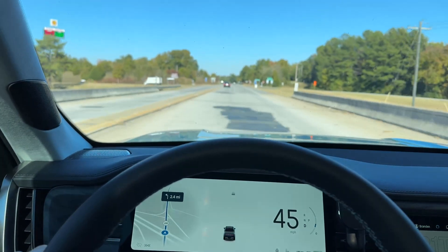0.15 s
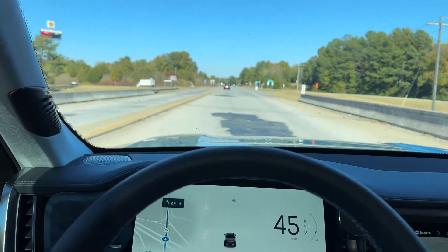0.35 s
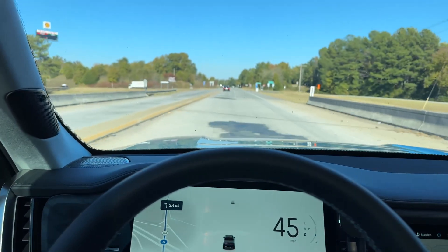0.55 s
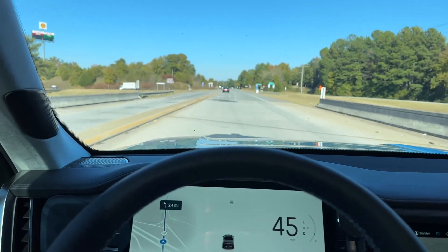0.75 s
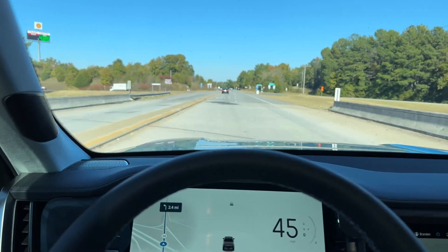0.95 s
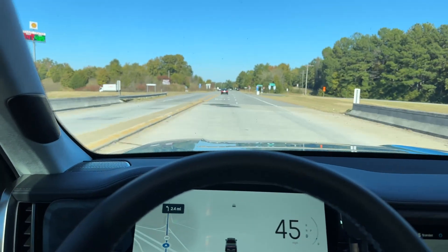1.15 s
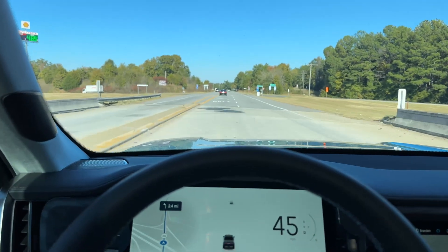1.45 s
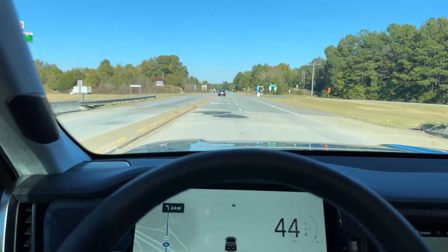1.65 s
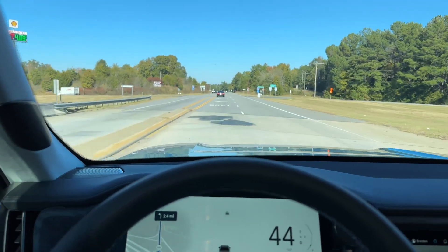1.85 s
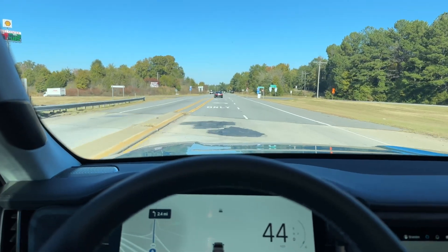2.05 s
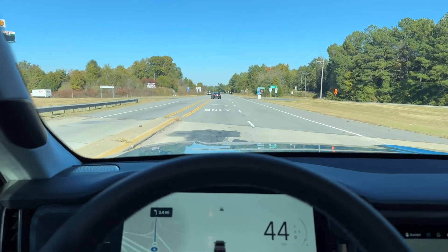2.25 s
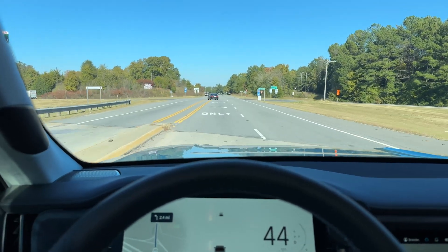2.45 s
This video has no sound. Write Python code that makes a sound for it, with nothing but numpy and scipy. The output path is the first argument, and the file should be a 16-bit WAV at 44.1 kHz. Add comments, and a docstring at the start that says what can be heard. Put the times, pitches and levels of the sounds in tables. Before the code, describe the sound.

Deep, boomy road rumble with steady muffled tyre roar inside a closed car, heard from the driver's seat. Soft thuds begin near 0.35 s and crowd together from 0.8 to 1.45 s, strongest around 1.1 s, with a brief coarse tread growl at 1.05-1.3 s and very faint plastic ticks and rustles. A last deep bump comes near 1.65 s; from 1.9 s the drone is smoother and quieter, over barely audible air hiss.

```python
"""Inside a car cruising at about 70 km/h. Road texture shakes the body and booms the cabin: shaped noise,
loudest over a rough stretch in the middle. Bumps ring decaying modes; the tread growls on a coarse patch.
Tyres roar almost steadily with narrow resonances and air hisses on the glass, all as shaped noise.
Trim chatters, ticks and rustles in noise bursts and squeaks once as a falling sine; a thin electrical
whine is a pure tone."""
import sys
import numpy as np
from scipy import signal
from scipy.fft import rfft, irfft
from scipy.io import wavfile
from scipy.ndimage import uniform_filter1d

SR = 44100
rng = np.random.default_rng(int(sys.argv[2]) if len(sys.argv) > 2 else 0)


def transcribe(signal):
    """Save signal, clipped to [-1, 1], as a 16-bit WAV file at the path in sys.argv[1]."""
    frames = np.atleast_2d(signal).T
    limited = np.clip(frames, -1, 1)
    pcm = np.round(limited * 32767).astype(np.int16)
    wavfile.write(sys.argv[1], SR, pcm)


N = 114660


def undb(db):
    """Decibels to amplitude gain."""
    return 10 ** (np.asarray(db) / 20)


def unit(x):
    """Scale to rms 1."""
    return x / np.sqrt(np.mean(x ** 2))


def noise(gain):
    """Random-phase noise of rms 1 with the given gain per frequency bin."""
    phase = 2 * np.pi * rng.random(len(gain))
    return unit(irfft(gain * np.exp(1j * phase), N))


def over_log_hz(points):
    """Interpolate (Hz, dB) points on log frequency, one value per bin."""
    hz, db = np.array(points).T
    f = np.maximum(np.fft.rfftfreq(N, 1 / SR), 1)
    return np.interp(np.log(f), np.log(hz), db)


def coloured(points):
    """Noise of rms 1 along (Hz, dB) points, rolled off at 12 dB/octave above the last."""
    f = np.maximum(np.fft.rfftfreq(N, 1 / SR), 1)
    last_hz = points[-1][0]
    rolloff = np.hypot(1, (f / last_hz) ** 2)
    return noise(undb(over_log_hz(points)) / rolloff)


def pair(points):
    """Unrelated noise of one colour on left and right."""
    return np.array([coloured(points), coloured(points)])


def wide(common, difference):
    """Left and right from their common part and their difference."""
    return np.array([common + difference, common - difference])


def walk(rate_hz):
    """Random levels, one per 1 / rate_hz, smoothed twice over that time; rms 1."""
    hold = int(SR / rate_hz)
    steps = np.repeat(rng.standard_normal(N // hold + 1), hold)
    return unit(uniform_filter1d(uniform_filter1d(steps, hold), hold)[:N])


def bursts(t, rows, rise_s, fall_s):
    """Sum of envelopes, each a straight rise and an exponential fall."""
    total = 0
    for start_s, db in rows:
        rise = np.clip((t - start_s) / rise_s, 0, 1)
        fall = np.exp(-np.maximum(t - start_s - rise_s, 0) / fall_s)
        total = total + undb(db) * rise * fall
    return total


def ring(age, hz, t60_s, rise_s):
    """One mode, pushed softly at age 0 and dying away by 60 dB per t60_s."""
    push = 1 - np.exp(-(age / rise_s) ** 2)
    decay = np.exp(-np.log(1000) * age / t60_s)
    return push * decay * np.sin(2 * np.pi * hz * age)


# Spectra of cabin boom, body rumble, rumble's left-right difference: [f/Hz, level/dB per Hz, relative]
BOOM_SPECTRUM = [(18, -40), (28, -18), (36, -3), (45, -2), (52, 2), (61, -8), (80, -14), (130, -35)]
RUMBLE_SPECTRUM = [(40, -21.5), (66, -8), (80, -5.5), (97, 2), (125, -1), (150, -3), (166, -8), (220, -15),
                   (300, -24.5), (500, -30.5), (1000, -55), (2500, -79)]
RUMBLE_SIDE_SPECTRUM = [(20, -34), (40, -7.5), (52, -6), (78, -3), (94, 4), (116, -13), (146, 0),
                        (170, -9.5), (250, -1), (320, -12.5), (700, -32.5), (2500, -69)]
BOOM_DB, RUMBLE_DB, RUMBLE_SIDE_DB = -27.5, -26.5, -40.5  # rms, before the roughness gains


def rumble(shake, boom):
    """Road texture shakes the body panels (shake) and the cabin air (boom)."""
    cabin_boom = undb(BOOM_DB) * boom * coloured(BOOM_SPECTRUM)
    body = undb(RUMBLE_DB) * shake * coloured(RUMBLE_SPECTRUM)
    side = undb(RUMBLE_SIDE_DB) * shake * coloured(RUMBLE_SIDE_SPECTRUM)
    return wide(cabin_boom + body, side)


# Spectra of tyre roar, common and left-right difference: [f/Hz, level/dB per Hz, relative]
TYRE_SPECTRUM = [(60, -13), (180, -1), (255, 6), (310, -4), (420, -1), (560, -5.5), (650, -10.5), (800, -9),
                 (980, -15), (1200, -16.5), (1330, -20), (1530, -19), (1950, -27), (2400, -28), (3200, -37),
                 (6000, -65), (16000, -76.5)]
TYRE_SIDE_SPECTRUM = [(60, -3), (200, -10.5), (255, 7.5), (310, -3.5), (480, -3.5), (800, -6), (1000, -9.5),
                      (1200, -11.5), (1550, -14), (2000, -23), (3000, -29.5), (6000, -54.5), (16000, -65)]
# Narrow resonances of tread and wheel wells: [f/Hz, half-width at half amplitude/Hz, rms level/dB]
TREAD_RESONANCES = [(504, 5.2, -54.5), (790.6, 25, -62.5), (1168, 25, -62.5), (1475, 40, -69)]
TYRE_DB, TYRE_SIDE_DB = -40.5, -45  # rms, before the slight shake gain
TYRE_SHAKE_EXPONENT = .047  # roar barely follows the road


def tyre_roar(shake):
    """Nearly steady broadband roar plus noise through narrow resonances."""
    f = np.fft.rfftfreq(N, 1 / SR)
    resonances = 0
    for hz, width_hz, db in TREAD_RESONANCES:
        resonances = resonances + undb(db) * noise(1 / (1 + ((f - hz) / width_hz) ** 2))
    common = undb(TYRE_DB) * coloured(TYRE_SPECTRUM) + resonances
    side = undb(TYRE_SIDE_DB) * coloured(TYRE_SIDE_SPECTRUM)
    return shake ** TYRE_SHAKE_EXPONENT * wide(common, side)


# Spectrum of air on the glass: [f/Hz, level/dB per Hz, relative]
AIR_SPECTRUM = [(1000, -1.5), (2500, 4.5), (4200, 3), (6200, -2.5), (8000, -8), (9700, -12), (11500, -24),
                (14000, -23.5), (16000, -28.5)]
AIR_DB = -66.5


def air():
    """Smooth hiss of air along the windows, unrelated left and right."""
    return undb(AIR_DB) * pair(AIR_SPECTRUM)


# Fine chatter of the trim: [t/s, level/dB before flicker]
CHATTER_LEVELS = [(0, -82), (.65, -81), (.9, -77), (1.08, -77), (1.17, -72), (1.4, -75), (1.75, -75),
                  (1.86, -81), (2.2, -83), (2.6, -84)]
# Ticks of loose plastic: [t/s, level/dB]
TICK_EVENTS = [(.838, -70), (.866, -66), (.942, -70), (1.002, -68), (1.111, -62), (1.164, -67),
               (1.225, -70), (1.274, -66), (1.42, -72), (1.532, -70), (1.672, -74), (1.703, -67),
               (1.866, -74)]
# Spectrum shared by ticks and chatter: [f/Hz, level/dB per Hz, relative]
TICK_SPECTRUM = [(2000, -8), (4500, -6.5), (6000, -4.5), (8000, -11), (9800, 1), (10800, -4),
                 (11800, -10.5), (15000, -8.5)]
CHATTER_FLICKER_DB, CHATTER_FLICKER_HZ = 2, 110
TICK_RISE_S, TICK_FALL_S = .002, .017


def chatter_and_ticks(t):
    """Loose plastic: noise under a flickering floor and short tick envelopes, added in power."""
    chatter_db = np.interp(t, *np.array(CHATTER_LEVELS).T)
    chatter = undb(chatter_db + CHATTER_FLICKER_DB * walk(CHATTER_FLICKER_HZ))
    ticks = bursts(t, TICK_EVENTS, TICK_RISE_S, TICK_FALL_S)
    return np.hypot(ticks, chatter) * wide(coloured(TICK_SPECTRUM), .55 * coloured(TICK_SPECTRUM))


WHINE_HZ, WHINE_DB = 14520, -85  # level is rms


def whine(t):
    """Faint steady electrical tone, a quarter cycle apart between the sides."""
    phase = 2 * np.pi * WHINE_HZ * t
    return np.sqrt(2) * undb(WHINE_DB) * np.array([np.sin(phase), np.cos(phase)])


# Bumps under the wheels: [t/s, thud level/dB, deep boom level/dB]
BUMP_EVENTS = [(.344, -16, -28), (.374, -16, -28), (.497, -17, -17), (.598, -14, -17), (.718, -14, -20),
               (.824, -11, -22), (.880, -8.5, -15), (.936, -9, -24), (.982, -15, -9), (1.060, -6, -22),
               (1.099, -6, -8), (1.173, -6.5, -9), (1.249, -10, -15), (1.274, -13, -8), (1.297, -18, -5),
               (1.357, -16, -14), (1.447, -17, -15), (1.638, -20, -9.5)]
# Cabin modes rung by a bump: [nominal f/Hz, t60/s, level/dB re thud]
CABIN_MODES = [(98, .11, -5), (122, .1, -6), (205, .04, -15)]
THUD_RISE_S = .0058
DEEP_HZ, DEEP_T60_S, DEEP_RISE_S = 51, .16, .015  # nominal pitch
BUMP_DETUNE = .03  # relative spread of pitch


def bumps(t):
    """Each bump rings short cabin modes fast and a deep boom that builds more slowly."""
    out = 0
    detunes = 1 + BUMP_DETUNE * rng.standard_normal((len(BUMP_EVENTS), 2))
    for (start_s, thud_db, deep_db), (thud_detune, deep_detune) in zip(BUMP_EVENTS, detunes):
        age = np.maximum(t - start_s, 0)
        thud = 0
        for hz, t60_s, db in CABIN_MODES:
            thud = thud + undb(db) * ring(age, hz * thud_detune, t60_s, THUD_RISE_S)
        deep = ring(age, DEEP_HZ * deep_detune, DEEP_T60_S, DEEP_RISE_S)
        out = out + undb(thud_db) * thud + undb(deep_db) * deep
    return out


SQUEAK_S, SQUEAK_LENGTH_S, SQUEAK_DB = .574, .0013, -61  # centre, 1/e half-length, peak
SQUEAK_HZ, SQUEAK_FALL_HZ_PER_S = 7550, 150000  # pitch at centre


def squeak(t):
    """One tiny trim squeak: a falling sine under a Gaussian envelope."""
    age = t - SQUEAK_S
    envelope = np.exp(-(age / SQUEAK_LENGTH_S) ** 2)
    phase = 2 * np.pi * age * (SQUEAK_HZ - SQUEAK_FALL_HZ_PER_S * age / 2)
    return undb(SQUEAK_DB) * envelope * np.sin(phase)


# Rustles of the trim: [t/s, level/dB before grain]
RUSTLE_EVENTS = [(.702, -60.5), (.724, -66), (.897, -68), (.932, -68), (1.124, -56.5), (1.170, -64.5),
                 (1.31, -65.5)]
# Rustle spectrum: [f/Hz, level/dB per Hz, relative]
RUSTLE_SPECTRUM = [(1200, -8.5), (2600, 0), (3500, -1.5), (4500, 1.5), (5600, -6), (7800, -7),
                   (10500, -11.5), (15000, -19)]
RUSTLE_RISE_S, RUSTLE_FALL_S = .011, .024
RUSTLE_GRAIN_DB, RUSTLE_GRAIN_HZ = 1.8, 220


def rustles(t):
    """Rubbing trim: grainy noise bursts, unrelated left and right."""
    envelope = bursts(t, RUSTLE_EVENTS, RUSTLE_RISE_S, RUSTLE_FALL_S)
    grain = undb(RUSTLE_GRAIN_DB * walk(RUSTLE_GRAIN_HZ))
    return envelope * grain * pair(RUSTLE_SPECTRUM)


# Spectrum of tread growl on a coarse patch: [f/Hz, level/dB per Hz, relative]
PATCH_SPECTRUM = [(120, -11), (250, 2.5), (400, 0), (550, -8), (780, -8.5), (1100, -27), (2500, -35.5)]
PATCH_START_S, PATCH_END_S, PATCH_RISE_S, PATCH_FALL_S = 1.05, 1.29, .029, .035
PATCH_DB = -42


def patch_growl(t):
    """Tread noise swells onto a coarse patch of road and decays after it."""
    rise = np.clip((t - PATCH_START_S) / PATCH_RISE_S, 0, 1)
    fall = np.exp(-np.maximum(t - PATCH_END_S, 0) / PATCH_FALL_S)
    growl = wide(coloured(PATCH_SPECTRUM), .6 * coloured(PATCH_SPECTRUM))
    return undb(PATCH_DB) * rise * fall * growl


# Left minus right: [f/Hz, level/dB]
LEFT_LEAN = [(60, 0.2), (88, 6), (125, -0.5), (155, 5.5), (240, -0.5), (310, 3), (450, -2), (620, 2),
             (1100, 0), (2200, -2), (4000, 1), (7000, 3), (10000, -0.5)]


def lean(x):
    """Tilt each frequency left or right, as the cabin does at the driver's seat."""
    side_db = over_log_hz(LEFT_LEAN)
    return irfft(rfft(x) * undb(np.array([side_db, -side_db]) / 2), N)


# How hard the road shakes the car: [t/s, body drone gain/dB, deep cabin boom gain/dB]
ROAD_ROUGHNESS = [(0, -2, -9), (.18, -1.5, -3), (.35, .5, -1), (.55, -1.5, -.5), (.76, .5, 1), (.93, 2, 1),
                  (1.13, 3.5, 3), (1.31, 3, 3), (1.48, 1.5, 2), (1.58, -2, 0), (1.72, 0, -1.5),
                  (1.86, -3, -5), (2.2, -2.5, -5.5), (2.42, -2, -2), (2.6, -2.5, -8)]


def scene():
    """Everything heard from the driver's seat."""
    t = np.arange(N) / SR
    times_s, shake_db, boom_db = np.array(ROAD_ROUGHNESS).T
    shake = undb(np.interp(t, times_s, shake_db))
    boom = undb(np.interp(t, times_s, boom_db))
    road = rumble(shake, boom) + tyre_roar(shake) + bumps(t) + patch_growl(t)
    trim = chatter_and_ticks(t) + squeak(t) + rustles(t)
    return lean(road + air() + trim + whine(t))


LOW_CUT_HZ, TOP_HZ = 29, 15700


def record(dry):
    """The phone cuts the deepest bass and the top."""
    low_cut = signal.butter(5, LOW_CUT_HZ, "high", fs=SR, output="sos")
    top_cut = signal.ellip(8, .2, 70, TOP_HZ, fs=SR, output="sos")  # .2 dB ripple, 70 dB stopband
    return signal.sosfilt(top_cut, signal.sosfilt(low_cut, dry))


dry = scene()
out = record(dry)
transcribe(out)
```